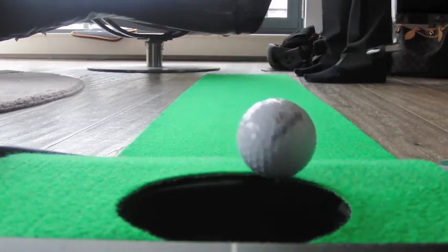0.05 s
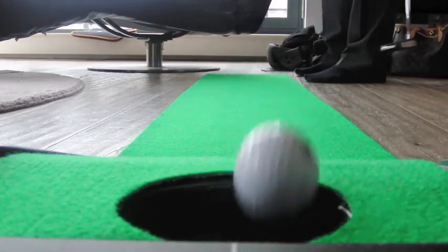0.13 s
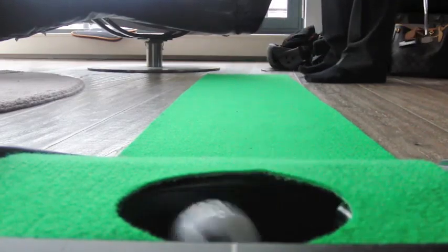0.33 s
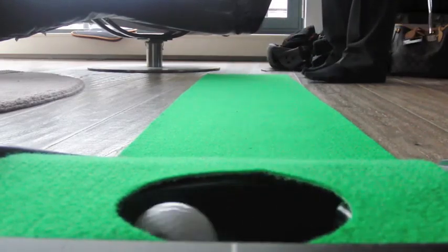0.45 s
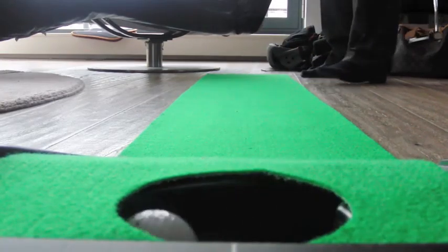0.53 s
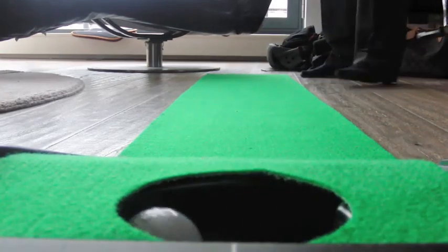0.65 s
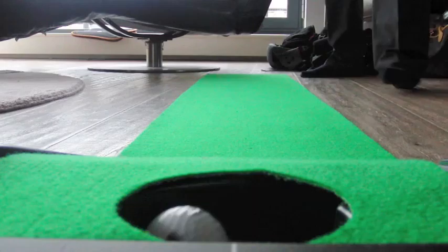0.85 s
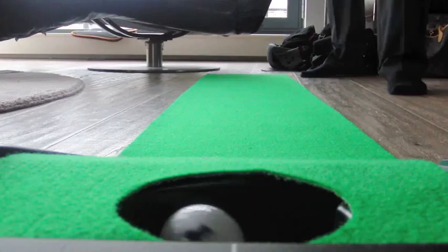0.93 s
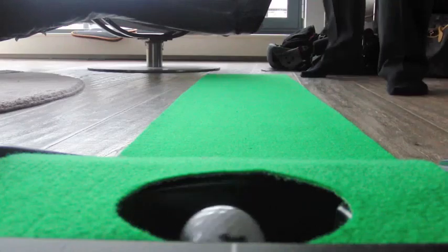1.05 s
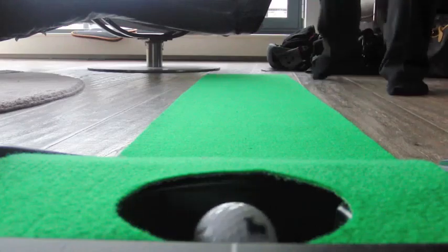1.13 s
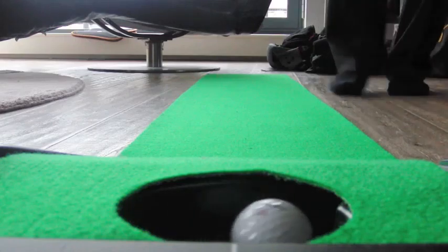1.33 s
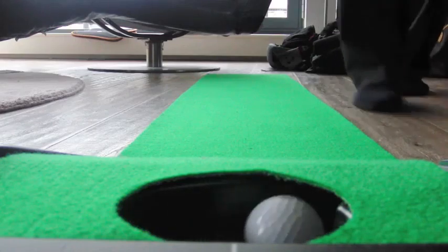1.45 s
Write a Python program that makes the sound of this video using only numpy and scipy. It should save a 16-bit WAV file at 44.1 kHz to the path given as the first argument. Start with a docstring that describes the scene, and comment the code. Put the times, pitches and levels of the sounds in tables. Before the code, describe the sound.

A golf ball drops into a plastic putting cup with hard, hollow knocks, then chatters, rolls and rocks to rest. A shoe shuffles faintly near the end. The microphone sits on the floor right by the cup, indoors.

```python
"""A golf ball knocks into the plastic cup of a putting mat: four hard hits, then it chatters and rocks to
rest. Each contact rings the cup, sets loose plastic buzzing and booms the ramp; the dimples rumble.
We are indoors, with the microphone of a small camera on the floor right in front of the cup.
The room answers the knocks, and near the end a shoe shuffles over a bed of room tone and hiss."""
import sys
import numpy as np
from scipy import signal
from scipy.fft import rfft, irfft, next_fast_len
from scipy.io import wavfile
from scipy.ndimage import uniform_filter1d

SR = 44100
rng = np.random.default_rng(int(sys.argv[2]) if len(sys.argv) > 2 else 0)


def transcribe(u):
    """Save the signal u as a 16-bit wav file named by the first command-line argument.

    u: samples, shape (n,) or (channels, n), limited to [-1, 1]; the rate is SR.
    q: integer samples, one column per channel.
    """
    v = np.clip(np.atleast_2d(u).T, -1, 1)
    q = np.round(v * 32767).astype(np.int16)
    wavfile.write(sys.argv[1], SR, q)


N = 66150

# The ball hitting the cup, close to the microphone. Each row: start in seconds, level in dB, then
# how hard the ramp, hollow, wall, rim, shell, lip and tick ring, in dB relative to that level.
CONTACTS = [(0.2273, -4, -15.5, -33.5, -29, -6, -4, -8, -11.5),
            (0.2295, -5, -10.5, -12, -11, -3, -11, -15, -13.5),
            (0.2396, -12, -6, -30, -10.5, -8, -6, -11, -13), (0.245, -12, -9, -7.5, -7, -18, -9, -8, -13.5),
            (0.251, -20, -2, -6, -16, -25, -18, -9, -21), (.262, -20.5, -8, -6, -18, -17, -15, -18, -11),
            (0.27, -22.5, -5.5, -17, -1.5, -19, -9, -13, -24),
            (.279, -22, -10, -10.5, -2, -6, -9, -3, -17.5),
            (.366, -3.5, -14.5, -31, -4.5, -9, -9, -5.5, -21),
            (.3783, -12.5, -15, -11.5, -14, -30, -10, -16, -12.5),
            (0.3829, -17, -1.5, -1.5, -8, -42, -4, -13, -20),
            (.400, -17.5, -5, -9, -1, -28, -12, -12, -19.5), (0.4086, -26, -4, -7, -1, -28, -34, -10, -30),
            (.417, -26, -4, -4.5, -9, -10, -16, -9, -18),
            (.4607, -4, -20.5, 0, -13, -13, -19.5, -12.5, -33.5),
            (.471, -17.5, -18, -8, -10, -1, -6, -6.5, -14.5), (.476, -18, -14, -42, -11, -10, -12, -7, -29),
            (.492, -25, -11, -4, -18, -6, -23, -18, -32), (0.502, -21, -10, 1, -14, -11, -27, -30, -39),
            (.5085, -23, -19, -16, 0, -12, -11, -8, -7), (.5205, -19, -18, -3.5, -1, -9, -8, -17.5, -24),
            (.526, -20, -4, -15, -8, -34, -10, -9, -23),
            (0.5451, -10.5, -16, -17, -14.5, -13.5, -5, -11, -30.5),
            (.549, -14, -8, 1, -22, -4, -26, -21, -34), (.559, -19.5, -15, -2, -6, -8, -16, -12, -18.5),
            (.576, -25.5, -6.5, -1.5, -11, -26, -36, -20, -35),
            (.597, -30.5, -24, 5, -2.5, -16, -35, -22, -37),
            (0.637, -33.5, -11, -3, -11, -15, -20.5, -26, -42),
            (0.684, -30.5, -12.5, -5.5, -7, -14, -16, -23, -34),
            (0.862, -34, -7, -28, -6, -6.5, -7, -12, -11.5),
            (.866, -36.5, -28, -9, -4.5, -8, -15.5, -16, -17.5),
            (0.886, -41, -3, -2.5, -15, -14, -11.5, -16, -24),
            (.901, -42, -0.5, -3, -9, -14, -22, -14, -17.5),
            (0.9754, -43, -12, -18, -7, -0.5, -7, -3, -10.5), (0.99, -36, -5, -3, -1, -25, -14, -20, -29),
            (1.008, -39.5, -3, -11, -6, -3, -7, -13, -28),
            (1.0185, -34.5, -15, -9, -13.5, -14, -4.5, -15, -27),
            (1.1141, -43, -16, -20, -23, -15, -12, -6, -9.5),
            (1.193, -38, -9, -5.5, -5.5, -11, -14.5, -16, -27),
            (1.261, -40.5, -3, -14, -15.5, -9, -26, -14, -21),
            (1.295, -39.5, -9, -4, -11, -5.5, -13, -15, -26)]
# Modes of the ramp and the cup. Each row: pitch in Hz, relative level in dB, t60 in seconds.
RAMP_MODES = [(40, -15, 0.41), (80.7, -2.5, 0.17), (153, 0.5, 0.074), (196, -3, .08)]
HOLLOW_MODES = [(290, -5, 0.013), (362.8, 0.5, 0.046)]
WALL_MODES = [(443, -14, 0.024), (532.7, 0.5, 0.033), (657, -11.5, 0.042)]
RIM_MODES = [(777, -8, 0.024), (883, 1, 0.021), (1074, -8.5, 0.024), (1168, -10.5, 0.026)]
SHELL_MODES = [(1443, 0, 0.022), (1873, 0, .02)]
LIP_MODES = [(2345, -2.5, 0.018), (2561, 0.5, .014), (2930, -4.5, 0.011), (3280, -10, 0.0047)]
TICK_MODES = [(4185, 4, .005), (4986, 8, 0.0043), (5800, -1, .005), (6680, -1, 0.0017), (8900, 0.5, 0.0036),
              (10200, -14.5, 0.0056)]
# Loose plastic, a low buzz and a bright fizz. Each row: frequency in Hz, relative level in dB.
BUZZ_COLOUR = [(150, -13), (250, -3.5), (655, -7.5), (779, -13), (855, -11), (1280, -9.5), (1410, -12.5),
               (2790, -18), (4000, -27), (5200, -33), (8800, -120)]
FIZZ_COLOUR = [(2060, -5), (3500, -2), (3960, -1), (7380, -10), (7930, -12), (8790, -12.5), (15300, -25.5),
               (16500, -41)]

def ball_knocks():
    """Every contact rings the cup, leaves the plastic buzzing and booms the ramp underneath."""
    out, t = np.zeros(N + SR), np.arange(SR // 2) / SR
    cup_modes = (HOLLOW_MODES, WALL_MODES, RIM_MODES, SHELL_MODES, LIP_MODES, TICK_MODES)
    for start, level_db, ramp_db, *parts_db in CONTACTS:
        shell_db, lip_db, tick_db = parts_db[3:]
        tones = sum(amp(db) * ring(modes, t) for db, modes in zip(parts_db, cup_modes))
        buzz = noise(len(t), BUZZ_COLOUR) * decay(t, db=(shell_db + lip_db) / 2 - 3.5, t60=0.1)
        crack = decay(t, db=-1.5, t60=0.0044)  # first instant of the contact
        fizz = noise(len(t), FIZZ_COLOUR) * (crack + decay(t, db=-2.5, t60=0.047))
        cup = (tones + amp(tick_db) * fizz) * rise(t, seconds=0.00035)
        boom = amp(ramp_db) * ring(RAMP_MODES, t) * rise(t, seconds=0.0058)
        knock = cup + buzz * rise(t, seconds=0.0025) + boom
        out[round(start * SR):][:len(t)] += amp(level_db) * knock
    return out[:N]


def ring(modes, t, scatter_db=2):
    """A struck part rings in decaying modes, their levels a little different at every blow."""
    return sum(decay(t, db + scatter_db * rng.normal(), t60) * np.sin(2 * np.pi * hz * t)
               for hz, db, t60 in modes)


# The ball rolling in the cup. Each row: time in seconds, rumble level in dB, ramp hum level in dB.
ROLL_LEVELS = [(.228, -68.5, -57), (.245, -55, -44), (.33, -42, -47), (.382, -44, -36), (.44, -48, -42),
               (.532, -40.5, -32), (.59, -54, -43), (.69, -54, -41), (.76, -70, -45.5), (.844, -64, -57),
               (.894, -53.5, -44), (.95, -71, -54), (1.0, -49, -49), (1.06, -60, -48.5), (1.13, -63, -58),
               (1.2, -56, -50.5), (1.37, -61.5, -60.5), (1.5, -57, -51)]
# The rumble from close up. Each row: frequency in Hz, relative level in dB.
ROLL_COLOUR = [(71, -54), (120, 7.5), (144, -11), (361, 2), (567, -7), (1330, -11.5), (1840, -21),
               (2010, -11), (3330, -24), (9000, -35), (11700, -88), (19800, -120)]

def ball_rolling(dimples_per_s=1500, hum_hz=78.3, half_width_hz=6.9):
    """Dimples rumble over the cup floor and keep the ramp humming."""
    roll_db, hum_db = curves(ROLL_LEVELS)
    touches = rng.random(N) < dimples_per_s / SR
    bumps = touches * amp(3.5 * rng.standard_normal(N)) * rng.standard_normal(N)
    hum = signal.hilbert(filtered(rng.standard_normal(N), lambda hz: peak(hz, hum_hz, half_width_hz)))
    hum = hum.real / (np.abs(hum) + 1e-6) ** 0.77  # evens out most of the swells
    rumble = coloured(unit(bumps) + rng.standard_normal(N), ROLL_COLOUR)
    return amp(roll_db) * rumble + amp(hum_db) * unit(hum)


# A shoe on the floor, faint at the microphone. Each row: time in seconds, level in dB.
SHUFFLE_LEVELS = [(1.05, -80), (1.11, -78), (1.15, -61), (1.2, -71), (1.33, -81), (1.365, -61),
                  (1.385, -58), (1.415, -52.5), (1.45, -53), (1.5, -53.5)]
# The scrape of its sole. Each row: frequency in Hz, relative level in dB.
SOLE_COLOUR = [(530, -51), (900, -36), (1040, -11), (1130, -11.5), (1990, -1), (2390, -7.5), (4200, -10),
               (7960, -15.5), (9650, -14), (16000, -28)]
# Grit underfoot. Each row: start in seconds, level in dB, pitch in Hz.
GRIT_SNAPS = [(.856, -44, 10600), (0.8695, -41, 10500), (0.943, -51, 11140), (1.383, -39, 4440),
              (1.401, -40, 4400), (1.4256, -40, 4180)]

def shoe_shuffle():
    """A sole drags over the boards; single grains of grit snap."""
    level_db, = curves(SHUFFLE_LEVELS)
    roughness = 1 + 0.37 * unit(uniform_filter1d(rng.standard_normal(N), size=60))
    out = amp(level_db) * coloured(roughness * rng.standard_normal(N), SOLE_COLOUR)
    t = np.arange(800) / SR
    for start, db, hz in GRIT_SNAPS:
        snap = np.sin(2 * np.pi * hz * t) + 0.54 * noise(len(t), FIZZ_COLOUR)
        out[round(start * SR):][:len(t)] += decay(t, db, t60=0.0044) * snap
    return out


# The room around the mat. Each row: frequency in Hz, t60 in seconds.
ROOM_DECAY = [(100, 0.75), (500, 0.47), (2000, 0.34), (6000, 0.53), (14000, 0.27)]

def room_answer(x):
    """The room answers about 7 ms late, and each frequency dies at its own speed."""
    hz, t, spectrum = signal.stft(rng.standard_normal(SR // 2), SR, nperseg=256)
    fade = decay(t, db=0, t60=along(ROOM_DECAY, hz)[:, None])
    _, tail = signal.istft(spectrum * fade, SR, nperseg=256)
    return signal.fftconvolve(np.pad(x, (300, 0)), tail / np.linalg.norm(tail))[:N]


# The background at floor level. Each row: frequency in Hz, relative level in dB.
ROOM_TONE_COLOUR = [(15, -8.5), (35, 1), (70, -6.5), (140, -12), (200, -4.5), (240, -14.5), (420, -14.5),
                    (800, -15), (1200, -21), (2750, -24.5), (8000, -30), (15300, -36), (16700, -51)]
# Its slow drift. Each row: time in seconds, level in dB.
ROOM_TONE_LEVELS = [(0, -60.5), (.3, -58.5), (.6, -59.5), (.9, -55.5), (1.2, -56.5), (1.5, -56)]

def room_tone():
    """The low hush of the room with the camera's hiss on top."""
    level_db, = curves(ROOM_TONE_LEVELS)
    return amp(level_db) * noise(N, ROOM_TONE_COLOUR)


def amp(db):
    """dB to gain."""
    return 10 ** (np.asarray(db) / 20)


def unit(x):
    """Scale to rms 1."""
    return x / np.sqrt(np.mean(x ** 2) + 1e-20)


def decay(t, db, t60):
    """A gain that starts at db and falls 60 dB every t60 seconds."""
    return amp(db - 60 * t / t60)


def rise(t, seconds):
    """An attack from 0 to 1 with this time constant."""
    return 1 - np.exp(-t / seconds)


def peak(hz, centre_hz, half_width_hz):
    """A bell-shaped response of height 1."""
    return 1 / (1 + ((hz - centre_hz) / half_width_hz) ** 2)


def along(points, hz):
    """Interpolate (Hz, value) points on a log axis."""
    freqs, values = np.transpose(points)
    return np.interp(np.log(hz + 1), np.log(freqs + 1), values)


def curves(rows):
    """A dB value per sample for each column after the time, silent before the first row."""
    times, *columns = np.transpose(rows)
    return [np.interp(np.arange(N) / SR, times, column, left=-120) for column in columns]


def filtered(x, response):
    """Filter x by a gain given as a function of frequency."""
    size = next_fast_len(x.shape[-1] + 8192)
    return irfft(rfft(x, size) * response(np.fft.rfftfreq(size, 1 / SR)), size)[..., :x.shape[-1]]


def coloured(x, colour):
    """x in the given colour, rms 1."""
    return unit(filtered(x, lambda hz: amp(along(colour, hz))))


def noise(samples, colour):
    """Coloured noise, rms 1."""
    return coloured(rng.standard_normal(samples), colour)


def scene():
    """In mono: the ball up front; the room's answer, the shoe and the room tone behind it."""
    knocks = ball_knocks()
    return (knocks + amp(-16.5) * room_answer(knocks) + ball_rolling() + shoe_shuffle() + room_tone())[None]


def record(dry):
    """The camera's microphone dips in one narrow band and keeps nothing above 16750 Hz."""
    return filtered(dry, lambda hz: (1 - 0.6 * peak(hz, centre_hz=7950, half_width_hz=200)) * (hz < 16750))


dry = scene()
out = record(dry)
transcribe(out)
```